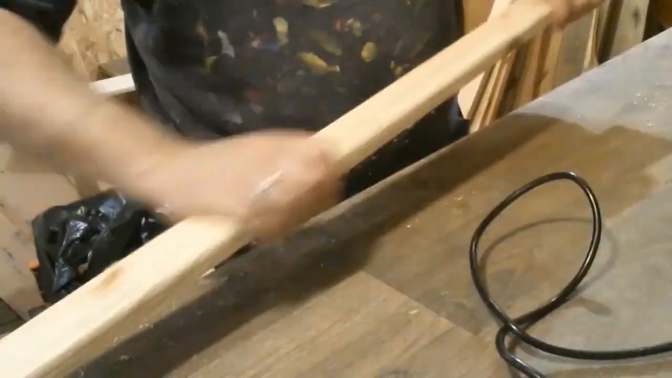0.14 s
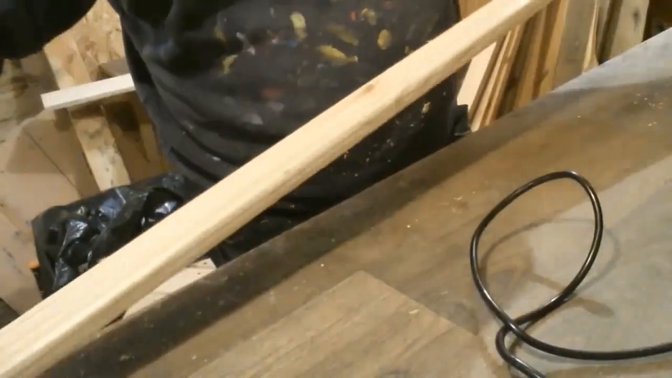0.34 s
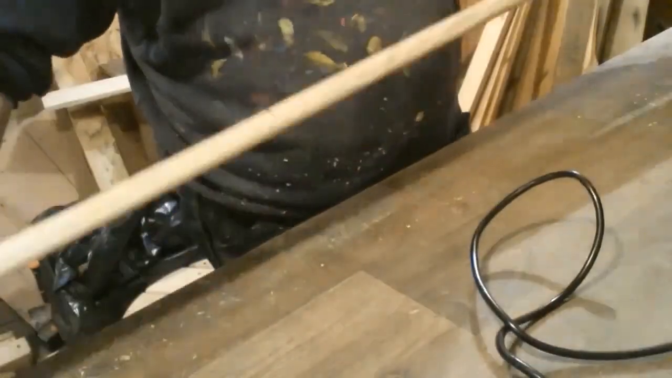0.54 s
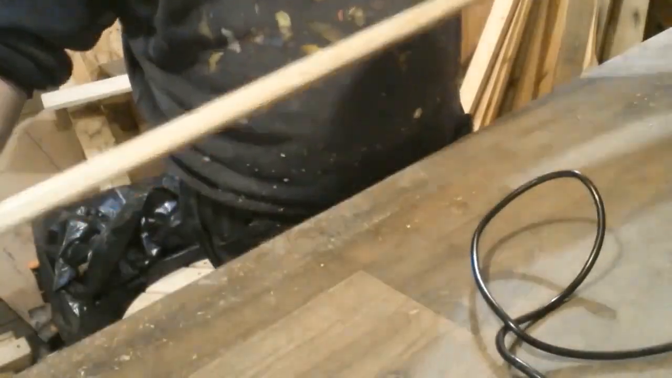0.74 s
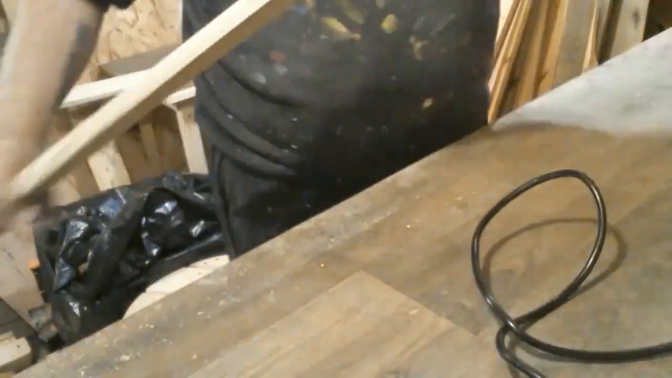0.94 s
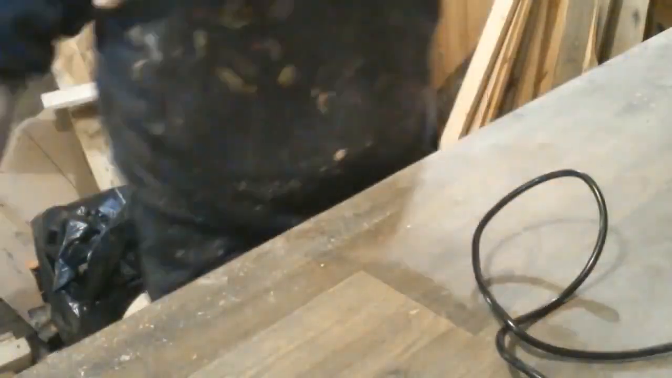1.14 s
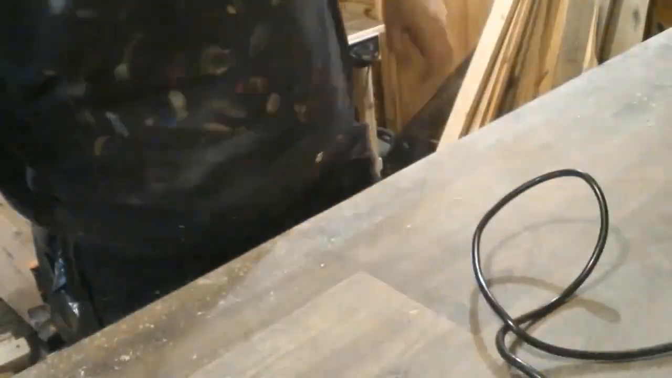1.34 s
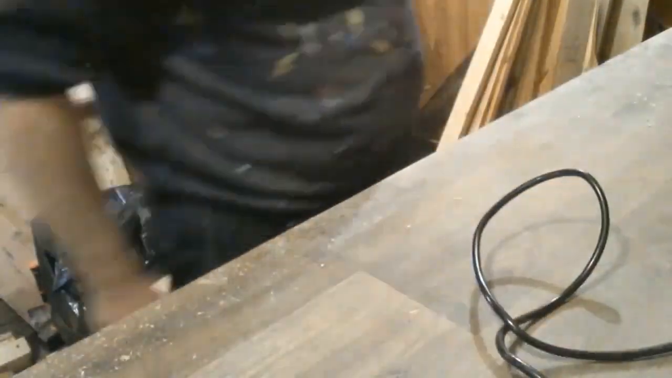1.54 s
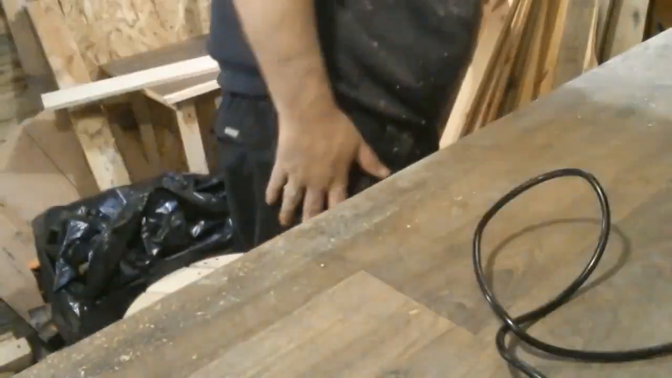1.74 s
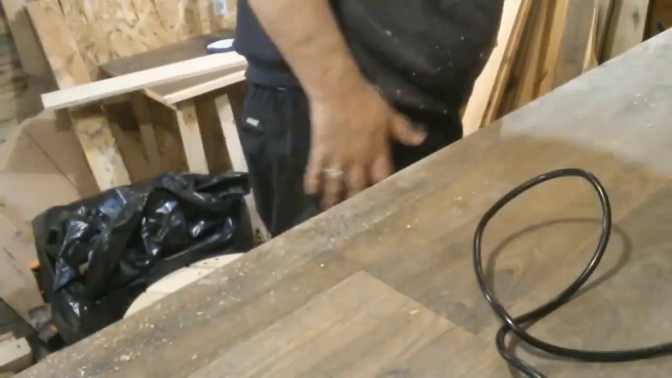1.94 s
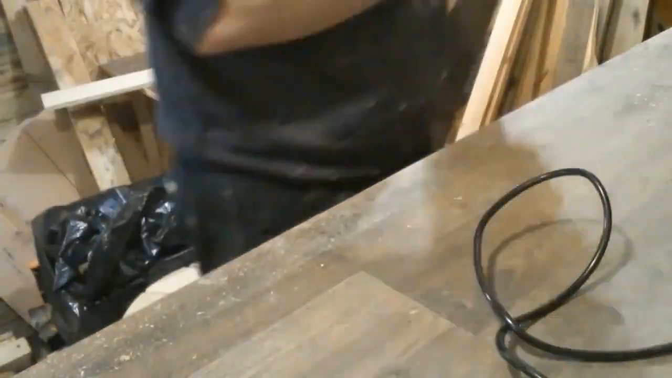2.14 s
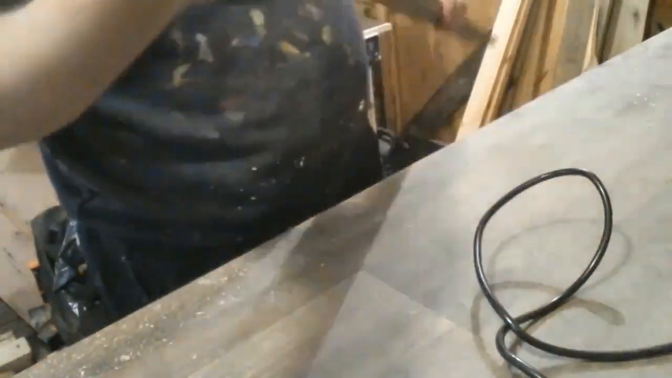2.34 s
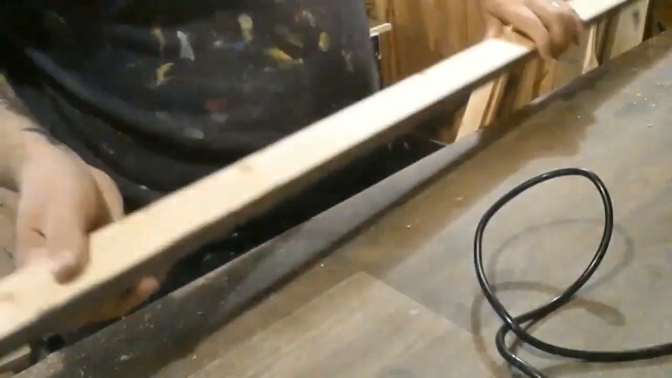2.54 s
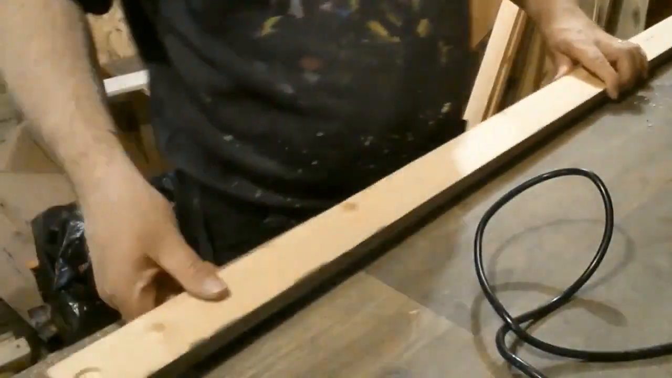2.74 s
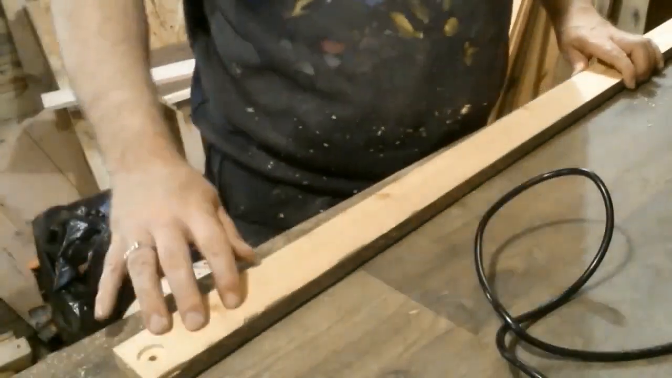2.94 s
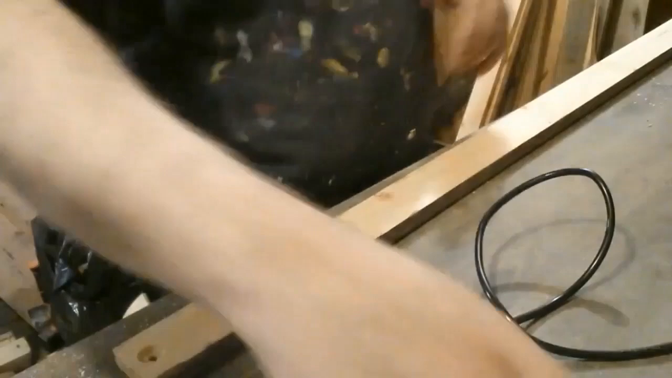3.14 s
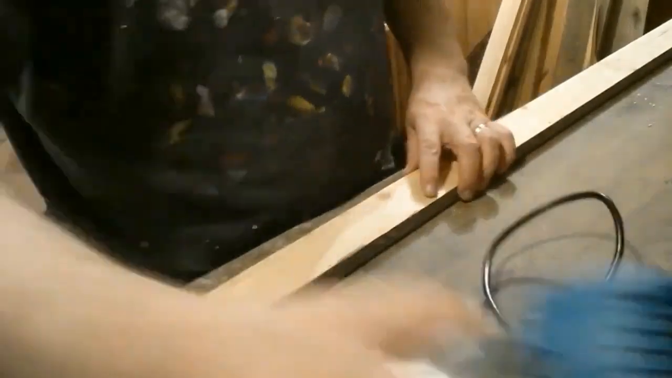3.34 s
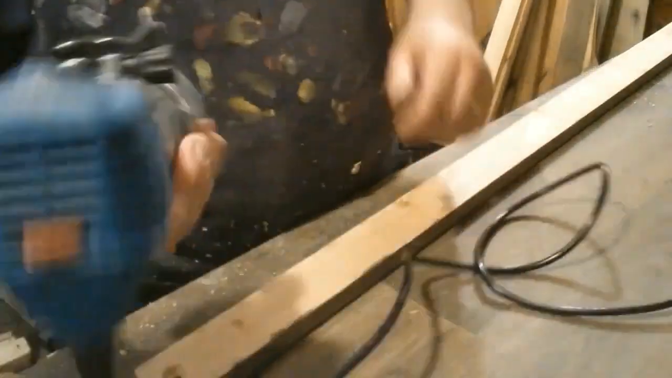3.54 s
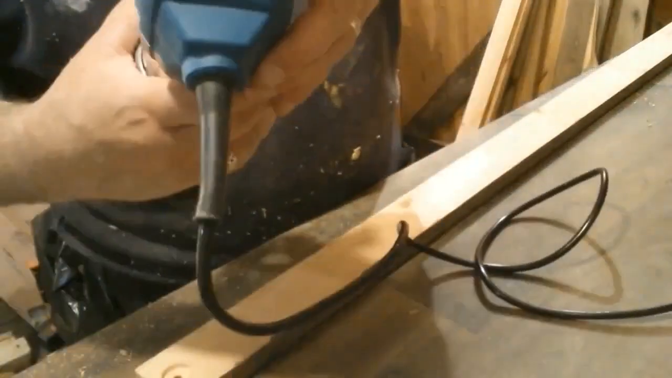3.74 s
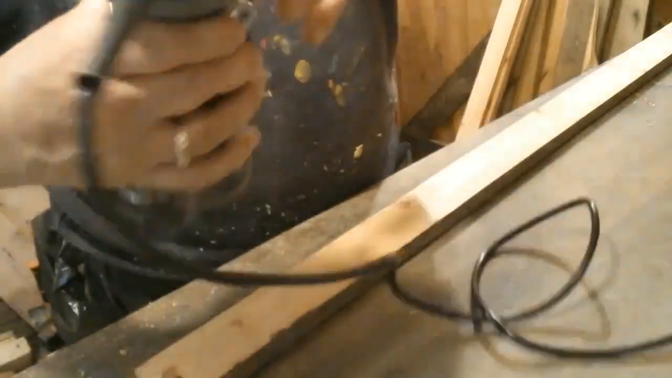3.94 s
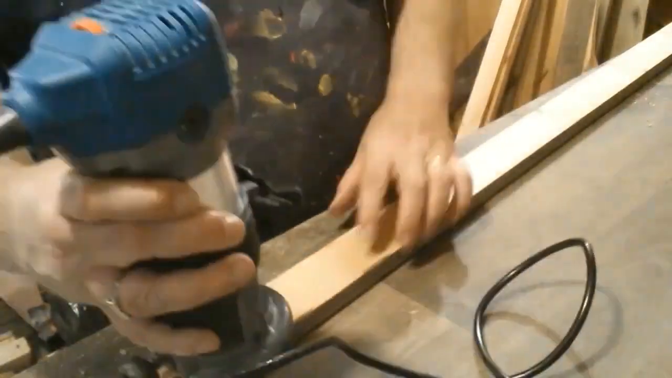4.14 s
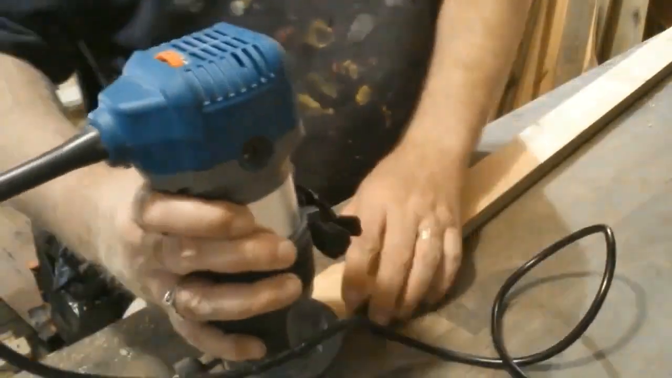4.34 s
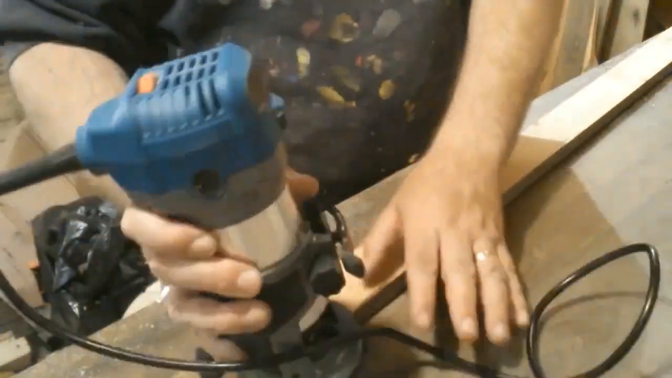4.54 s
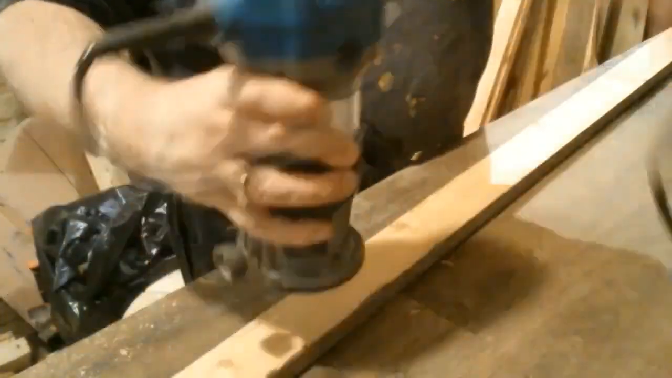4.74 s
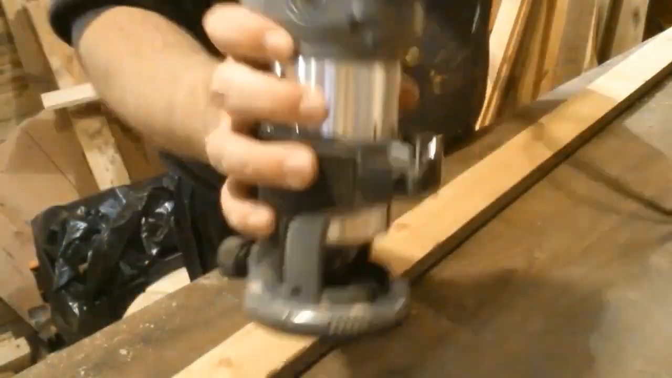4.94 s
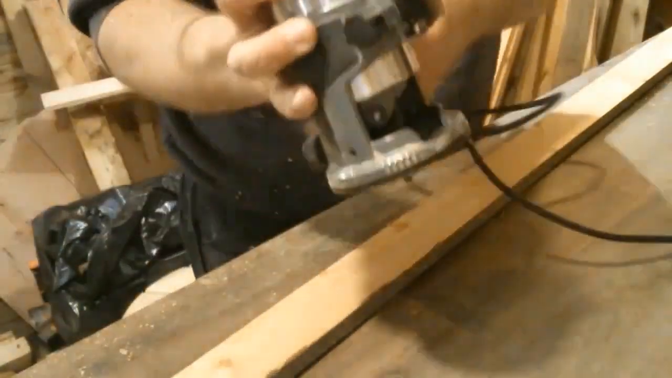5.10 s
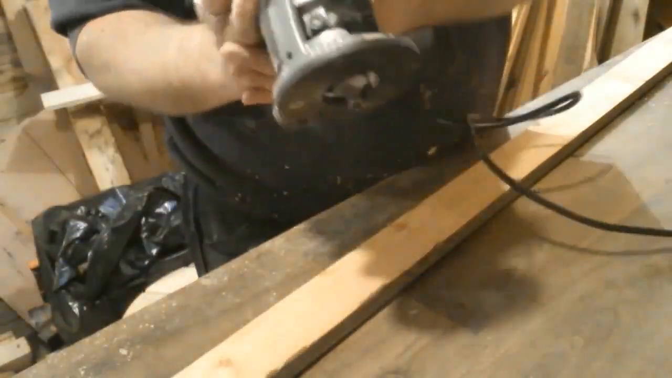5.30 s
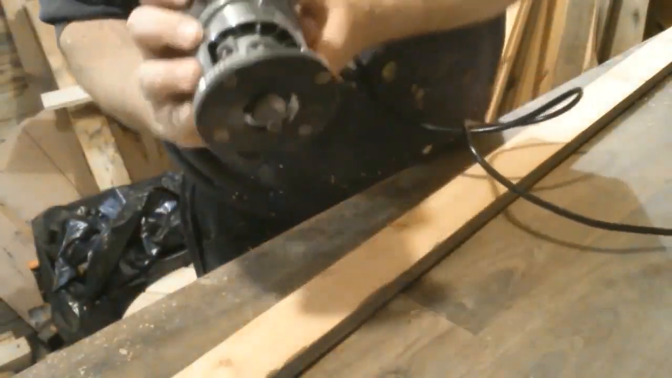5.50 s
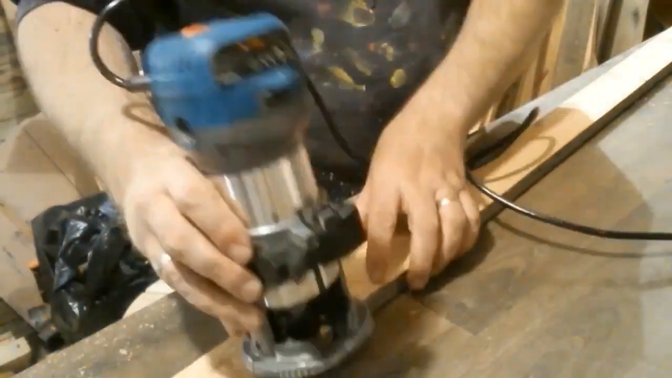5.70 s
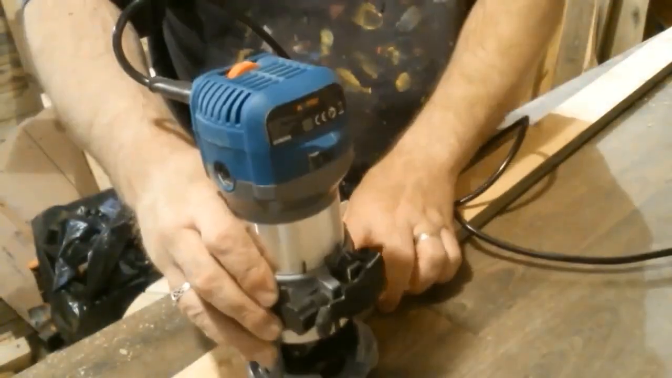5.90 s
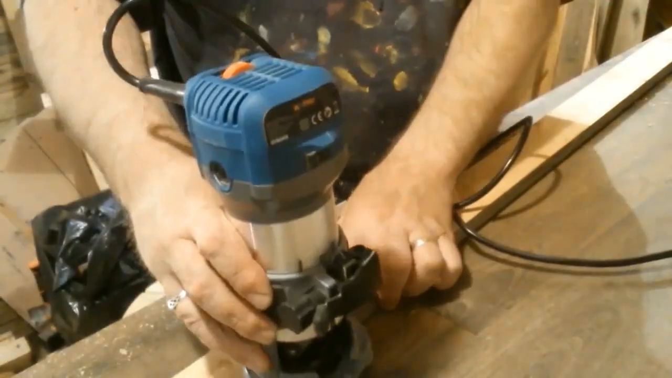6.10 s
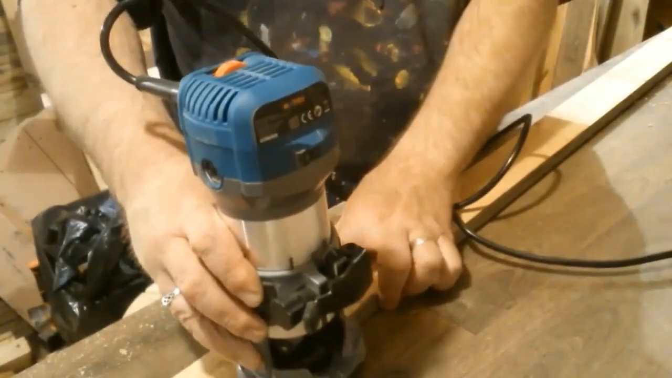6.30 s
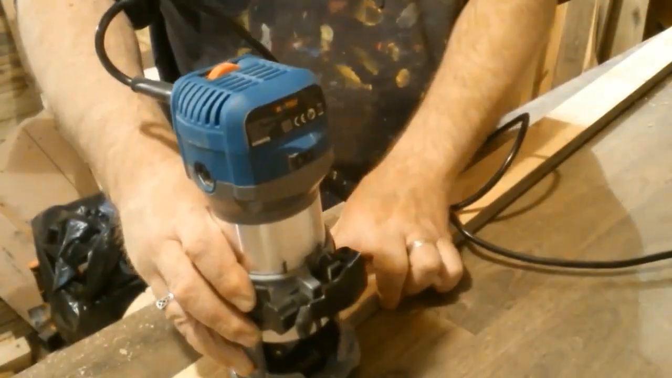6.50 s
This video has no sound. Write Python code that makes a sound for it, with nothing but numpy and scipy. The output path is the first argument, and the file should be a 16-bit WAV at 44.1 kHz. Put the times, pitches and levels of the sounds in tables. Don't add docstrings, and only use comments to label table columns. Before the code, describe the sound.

In a small workshop, the hiss of a finished cut dies away while hands and cloth rustle and planks knock on a bench, one heavy thump standing out, another sharper clack later. Over low room hum a handheld electric router then starts, rising fast to a high whine with strong rushing air, and dips slightly in pitch as it meets the wood. Close microphone, noise reduction making the rush patchy.

```python
import sys
import numpy as np
from scipy import signal
from scipy.fft import rfft, irfft
from scipy.io import wavfile
from scipy.ndimage import uniform_filter1d

SR = 44100
rng = np.random.default_rng(int(sys.argv[2]) if len(sys.argv) > 2 else 0)


def level_to_linear(level):
    exponent = np.asarray(level, float) / 20
    return 10 ** exponent


def dump_mix(stems):
    frames = np.atleast_2d(stems).T
    limited = np.clip(frames, -1, 1)
    pcm = np.round(limited * 32767).astype(np.int16)
    wavfile.write(sys.argv[1], SR, pcm)


N = 289296
HZ = np.fft.rfftfreq(512, 1 / SR)[:, None]
FRAME_S = np.arange(N // 128 + 5) * 128 / SR

# [t/s, f/Hz]
SPEED = [(3.88, 1000), (3.95, 1150), (4.02, 1299), (4.06, 1371), (4.11, 1430), (4.16, 1479), (4.24, 1527),
         (4.34, 1561), (4.46, 1591), (4.61, 1611), (4.8, 1619), (5.03, 1622), (5.33, 1612), (5.63, 1602),
         (6.22, 1592), (6.28, 1553), (6.46, 1535), (6.56, 1508)]
ORDERS_DB = {1: -67, 2: -59.5, 3: -67, 4: -60, 5: -68.5, 6: -68.5, 8: -56, 9: -63.5}
# [f/Hz, likeness 0..1]
SHOP_SAME = [(25, 0.37), (60, 1), (140, 0.97), (550, 0.91), (1650, .5), (5000, 0.071), (15000, 0.12)]


def evened(x):
    return x / np.sqrt(np.mean(x ** 2) + 1e-20)


def read(points, hz):
    f, value = np.transpose(points)
    return np.interp(np.log(hz + 1), np.log(f + 1), value)


def columns(rows, t):
    s, *values = np.transpose(rows)
    return [np.interp(t, s, v) for v in values]


def add(mix, s, sound):
    part = mix[:, round(s * SR):][:, :sound.shape[1]]
    part += sound[:, :part.shape[1]]


def held(t, start, length, rise, fall):
    return -rise * np.maximum(start - t, 0) - fall * np.maximum(t - start - length, 0)


def summed(*dbs):
    return 10 * np.log10(sum(level_to_linear(db) ** 2 for db in dbs) + 1e-30)


def patches(bins, frames):
    field = rng.standard_normal((len(FRAME_S), len(HZ))).T
    field = uniform_filter1d(field, bins, 0)
    return evened(uniform_filter1d(field, frames, 1))


def pair(level_db, same, lead=0.):
    a, b, c, d = rng.standard_normal((len(FRAME_S), len(HZ), 4)).T
    same = np.clip(same, 0, 1)
    left, other = a + 1j * b, c + 1j * d
    right = (same * left + np.sqrt(1 - same ** 2) * other) * np.exp(-1j * lead)
    spectra = np.array([left, right]) * level_to_linear(level_db)
    return 0.73 * signal.istft(spectra, nperseg=512, noverlap=384)[1][:, :N]


def band_db(colour, lo_hz, hi_hz):
    db = read(colour, HZ)
    in_band = (HZ > lo_hz) & (HZ < hi_hz)
    return db - 10 * np.log10(np.sum(level_to_linear(db[in_band]) ** 2))


def fade(lo_hz, hi_hz):
    return np.clip(np.log((HZ + 1) / lo_hz) / np.log(hi_hz / lo_hz), 0, 1)


def tinted(x, colour, lo_hz, hi_hz):
    hz = np.fft.rfftfreq(N, 1 / SR)
    gain = level_to_linear(read(colour, hz))
    share = np.sum(gain[(hz > lo_hz) & (hz < hi_hz)] ** 2) / len(hz)
    return irfft(rfft(x) * gain / np.sqrt(share), N)


def shop():
    # [f/Hz, level/dB per Hz]
    rustle_colour = [(530, -35.5), (900, -3), (1370, -13.5), (2020, -12), (3040, -15.5), (3590, -16.5),
                     (7060, -17.5), (15100, -16), (16000, -20.5)]
    # [t/s, length/s, level/dB, low part relative/dB]
    strokes = [(0.456, 0.02, -60, -9.5), (0.522, 0.098, -68, -7), (0.655, .03, -64.5, -7),
               (0.713, 0.017, -60.5, -2.5), (0.753, 0.034, -68, -5.5), (0.808, 0.017, -59.5, -3),
               (0.833, 0.27, -58, -13), (1.134, 0.029, -64.5, 7), (1.191, 0.1, -64, -9.5),
               (1.537, 0.22, -76, -1.5), (1.676, 0.045, -65.5, 1.5), (1.744, 0.24, -79, 0),
               (2.075, 0.16, -75, -3), (2.184, 0.031, -69.5, 5.5), (2.228, .12, -62, -10),
               (2.286, 0.031, -76, 16.5), (2.456, 0.18, -76.5, -9), (2.672, 0.023, -72, -10),
               (2.734, 0.06, -65, -3.5), (2.797, 0.095, -72.5, 8), (3.154, 0.01, -71, 6.5),
               (3.17, 0.15, -72.5, -2), (3.382, 0.072, -67, 1.5), (3.492, 0.088, -76.5, 1.5),
               (3.645, 0.015, -82, -4)]
    hiss_db = -79.5
    rise, fall = 1200, 801
    colour_db = band_db(rustle_colour, 2500, 16100) - 30 * (1 - fade(400, 1000))
    colour_db = colour_db - 70 * (FRAME_S > 3.845)
    low = 1 - fade(2300, 4600)

    dying_db = -38 - 38 * FRAME_S + held(FRAME_S, 0, 0.42, rise, fall)
    dying_db = dying_db + low * (-9.5 - 12 * (FRAME_S > 0.333))
    strokes_db = (top_db + low_db * low + held(FRAME_S, s, length, rise, fall)
                  for s, length, top_db, low_db in strokes)
    db = colour_db + summed(dying_db, *strokes_db)
    db = db + 3.15 * patches(3, 14) + 1.3 * patches(150, 2)
    return pair(summed(db, colour_db + hiss_db), read(SHOP_SAME, HZ))


def hum():
    # [f/Hz, level/dB per Hz]
    hum_colour = [(12, -51.5), (20, -18.5), (54, -24), (113, -11.5), (188, -10), (274, 0.5), (339, -6),
                  (511, -8), (564, -9.5), (622, -5), (709, -10), (835, -20), (1000, -31.5), (1300, -58.5),
                  (2200, -120)]
    # [t/s, length/s, level/dB]
    swells = [(0, 0.03, -56), (0.076, 0.01, -44.5), (0.082, 1.1, -59.5), (0.29, 0.031, -73.5),
              (0.432, 0.043, -75), (0.596, 0.045, -63), (1.22, 0.13, -62.5), (1.39, 0.1, -68.5),
              (1.526, .02, -61), (1.584, 0.33, -63.5), (1.762, 0.057, -59.5), (1.885, .025, -61),
              (1.953, 0.11, -66.5), (2.074, 0.18, -63), (2.29, 0.034, -57), (2.368, 0.042, -64.5),
              (2.432, 0.5, -69), (2.843, 0.11, -70.5), (3.053, 0.54, -67), (3.16, .15, -63),
              (3.397, .04, -63.5), (3.495, 0.021, -65), (3.56, 0.083, -70), (3.794, .07, -74),
              (3.914, .01, -66)]
    hum_db, drone_db, swing = -74, -89.5, 401
    swells_db = (top_db + held(FRAME_S, s, length, swing, swing) for s, length, top_db in swells)
    db = summed(hum_db, *swells_db) + 2.7 * patches(2, 8) - 10 * np.log10(len(HZ))
    swelling = tinted(pair(db, read(SHOP_SAME, HZ)), hum_colour, 120, 900)

    drone_colour = [(15, -1.5), (40, -1.0), (120, 2.5), (200, -23.5), (400, -77)]  # (Hz, dB)
    drone = tinted(rng.standard_normal((2, N)), drone_colour, 25.4, 200)
    mute = level_to_linear(-80 * np.clip((np.arange(N) / SR - 3.89) / 0.086, 0, 1))
    return mute * (swelling + level_to_linear(drone_db) * drone)


def knock(db, hz, bright_db, crack_db, chance):
    # [ratio to the body tone, level/dB, t60/s]
    modes = [(1.0, 1.5, 0.16), (1.5, -0.5, .09), (1.9, -11, 0.12), (2.45, -2.5, 0.073), (3.2, -17, 0.15),
             (3.9, -8.5, .05), (4.4, -16.5, 0.031), (5.3, -21.5, 0.031), (6.4, -21, 0.047),
             (7.7, -25.5, .03), (9.1, -19, 0.015)]
    t = np.arange(6000) / SR
    ring = 0.5
    body = 0
    for (ratio, mode_db, t60), c in zip(modes, chance[0]):
        decay = level_to_linear(mode_db + bright_db * np.log2(ratio) - 60 * t / (t60 * ring))
        body = body + decay * np.sin(2 * np.pi * hz * ratio * (1 + 0.066 * c) * t)
    body = body * np.clip(t / .0012, 0, 1)

    crack = signal.lfilter([1, -1], [1, -1.7, .72], chance)
    crack = crack * (level_to_linear(-60 * t / 0.042) + level_to_linear(-11 - 60 * t / 0.076))
    crack_pair = (crack + 0.71 * crack[0]) / abs(crack).max() / 2
    sound = body / abs(body).max() + level_to_linear(crack_db) * crack_pair

    echoes = chance[:, ::-1] * level_to_linear(-60 * t / .1) * (t > .004)
    echoes = (echoes + 1.2 * echoes[0]) / np.linalg.norm(echoes) / 2
    sound = sound + level_to_linear(-7.5) * signal.fftconvolve(sound, echoes, axes=1)[:, :len(t)]
    sound = signal.sosfilt(signal.butter(2, 190, "high", fs=SR, output="sos"), sound)
    return level_to_linear(db + np.array([[-.5], [.5]])) * sound


def air():
    # [t/s, level/dB, turn of the vents (+ towards the microphone)]
    rush = [(3.9, -38.5, 0.81), (4.05, -40, 0.41), (4.42, -41, 0.45), (4.75, -44, -0.29),
            (4.9, -42.5, 0.23), (5.0, -43, -0.1), (5.14, -43.5, -1.34), (5.25, -40, 0.58),
            (5.62, -42, 0.46), (5.7, -42.5, 0.73), (5.85, -41.5, -0.06), (6.12, -42.5, 0.0014),
            (6.2, -41.5, 0.54), (6.33, -42, 0.43), (6.56, -41, -0.52)]
    # [f/Hz, level/dB per Hz]
    air_colour = [(1120, -55.5), (1900, -6.5), (2500, -6.5), (2910, -2), (3510, 0.5), (4720, 0), (5840, -1),
                  (11100, -0.5), (12000, -0.5), (15200, 0.5), (16000, -18)]
    # [f/Hz, likeness 0..1]
    air_same = [(1500, 0.92), (2500, 0.81), (5000, 0.18), (9000, 0.2), (15000, 0.44)]
    # [t/s, delay/s]
    air_lead = [(3.85, 2e-5), (4.3, 7e-5), (4.8, -4e-5), (5.3, 5e-5), (5.8, -6e-5), (6.2, 6e-5),
                (6.56, -2e-5)]
    # [centre f/Hz, width/Hz, depth/dB]
    valleys = [(1800, 140, -15), (2230, 90, -5), (2900, 130, -6), (4350, 120, -3), (4800, 130, -5.5),
               (7600, 200, -3.5), (9300, 200, -2.5), (11700, 200, -2.5), (13250, 300, -4)]
    level_db, turn = columns(rush, FRAME_S)
    level_db = level_db + 6
    top_db = 1.5 * turn
    spun_s = np.maximum(FRAME_S - SPEED[0][0], 0)
    low_db = -2.5 * turn + 8 * np.exp(-spun_s / 0.31)

    lock_s, loose_hz = 4.06, 850
    locked = np.clip((FRAME_S - lock_s) / 0.074 + .5, 0, 1)
    edge_hz = loose_hz + (0.93 * columns(SPEED, FRAME_S)[0] - loose_hz) * locked
    under_db = -16 - 5.5 * np.clip((FRAME_S - lock_s) / 0.32, 0, 1)
    under_db = under_db + np.maximum(5 + held(FRAME_S, 1.9, .25, 25, 43), 0)

    db = band_db(air_colour, 3500, 9000)
    db = np.where(HZ < 2000, db[24], np.where(HZ > 15200, db[175], db))
    db = db + level_db + under_db * (1 - fade(1400, 1703))
    db = db + low_db * (1 - fade(2600, 3000)) + top_db * fade(8000, 10000)
    db = db - 700 * np.clip(1.053 + 0.019 * patches(8, 10) - HZ / edge_hz, 0, 1)
    drift = patches(3, 24)
    for hz, width, dip_db in valleys:
        db = db + dip_db * np.exp(-((HZ - hz) / width) ** 2) * np.clip(1 + 0.6 * drift, 0, 4)
    db = db + 2.2 * drift + 0.98 * patches(120, 3)
    start = np.clip((np.arange(N) / SR - 3.853) / 0.048, 0, 1)
    lead = 2 * np.pi * HZ * columns(air_lead, FRAME_S)[0]
    return start * pair(db, read(air_same, HZ), lead)


def beam(k, t):
    beams = {1: [(4.05, 0.065, -61.5, 0.77), (4.17, 0.12, -44.5, 0.44), (4.3, .48, -51, 0.24),
             (4.83, 0.18, -56.5, -0.059), (5.15, 0.16, -55, -0.56), (5.38, 0.22, -55.5, -0.66),
             (5.6, 0.26, -55, -0.93), (5.87, 0.17, -53, -0.38), (6.1, 0.16, -50, 0.073),
             (6.26, .35, -53.5, 1)], 2: [(3.96, .06, -53, 1), (4.32, .42, -55, 1), (5.25, .33, -51, 0.65),
             (5.72, 0.29, -54.5, -0.71), (6.35, .3, -49, 0.34)], 3: [(4.01, 0.053, -54, 0.76),
             (4.12, 0.11, -47, 0.69), (4.27, 0.1, -50, .2), (4.73, 0.091, -51.5, .8),
             (6.36, 0.047, -55.5, 0.81)], 4: [(4.21, 0.1, -48, 1.7), (4.4, 0.31, -41.5, 0.63),
             (4.8, 0.097, -42.5, 0.86), (5.72, 0.56, -48, 0.7), (6.3, 0.32, -50.5, 0.97)]}
    beams_8 = [(4.02, .03, -43, 1.2), (4.08, .03, -45, .5), (4.19, .34, -47.5, 1), (4.7, .11, -48.5, 1),
               (4.85, .07, -46, -.7), (4.99, .06, -44, -.8), (5.085, .055, -44, 1), (5.17, .07, -44, -.9),
               (5.285, .25, -43.5, 1), (5.58, .06, -48, -.8), (5.69, .1, -43.5, 1), (5.84, .39, -44, -.35),
               (6.29, .16, -50, 1), (6.51, .1, -56, -5)]
    swing = 301
    rows = [(0, t[-1], ORDERS_DB[k], 0.94)] + {**beams, 8: beams_8}.get(k, [])
    powers = [level_to_linear(db + held(t, s, length, swing, swing)) ** 2 for s, length, db, share in rows]
    left = np.sqrt(sum(powers))
    right = sum(power * row[3] for power, row in zip(powers, rows)) / left
    return left, right


def whine():
    first = round(3.85 * SR)
    t = np.arange(first, N) / SR
    turns = np.cumsum(columns(SPEED, t)[0]) / SR
    out = np.zeros((2, N))
    for k in ORDERS_DB:
        ports = beam(k, t)
        slow = [np.interp(t, FRAME_S, evened(uniform_filter1d(v, 12)))
                for v in rng.standard_normal((5, len(FRAME_S)))]
        speak = np.clip((t - (3.99 if k < 3 else 3.92)) / 0.091, 0, 1)
        for ear, side in enumerate((1, -1)):
            phase = 2 * np.pi * k * turns + .5 * slow[0] + 0.05 * side * slow[1] + 0.13 * side
            waver = level_to_linear(1.6 * slow[2 + ear] + 1.8 * slow[4] / k)
            out[ear, first:] += np.sqrt(2) * speak * ports[ear] * waver * np.cos(phase)
    return out


def leaks():
    # [t/s, level/dB, centre f/Hz, width/Hz, length/s]
    blobs = [(4.206, -75, 1257, 300, 0.16), (4.42, -81.5, 1178, 245, 0.29), (5.52, -65.5, 1036, 199, 0.035),
             (5.628, -64, 865, 298, 0.053), (5.634, -54, 390, 476, 0.076), (5.956, -87, 1225, 137.5, 0.38),
             (6.134, -61.5, 592, 179, 0.062), (6.18, -80.5, 1207, 251, 0.23), (6.442, -71, 600, 180, 0.075),
             (6.523, -68, 604, 200, 0.04), (6.508, -77, 1090, 250, 0.1)]
    power = 1e-14
    for s, db, hz, width, length in blobs:
        shape = np.exp(-((HZ - hz) / (0.32 * width)) ** 4)
        swell = np.exp(-((FRAME_S - s) / (0.37 * length)) ** 2 * 1.6)
        power = power + level_to_linear(db) ** 2 * shape / shape.sum() * swell
    return pair(10 * np.log10(power) + 4.8 * patches(1, 5), 0.96)


def scene():
    # [t/s, peak level/dB, body f/Hz, brightness/dB per octave, crack relative/dB]
    knocks = [(.071, -36, 474, -2, -25), (.284, -44.5, 457, 1.5, -23), (.61, -49, 278, -10, -11),
              (0.841, -51.5, 310, 1, -21), (1.138, -60.5, 277, -5, 21.5), (1.3285, -24, 249.6, 2.5, -22),
              (1.333, -23, 243, 2, -16), (1.519, -51.5, 458, -7, -14), (1.578, -67, 362, -7, -8),
              (1.671, -64.5, 480, -12, 13.5), (1.722, -55, 300, -1, -21), (1.914, -64, 228, 1, -2),
              (2.19, -56.5, 370, 11, 8), (2.278, -56, 342, 3, -23), (2.7947, -30, 251.3, 9.5, -2),
              (2.862, -45, 265, 2, -1), (3.145, -68, 322, 6, -9), (3.173, -55.5, 256, 9, -23),
              (3.27, -59.5, 216, 8, -22), (3.377, -64, 410, -3, -13), (3.4, -52.5, 193, 8, -7),
              (3.56, -72, 277, 4, -12)]
    mix = air() + whine() + leaks() + hum() + shop()
    for (s, *row), chance in zip(knocks, rng.standard_normal((len(knocks), 2, 6000))):
        add(mix, s - .0008, knock(*row, chance))
    return mix


def top_cut(x):
    return signal.sosfilt(signal.butter(12, 17000, fs=SR, output="sos"), x)


def record(dry):
    hz, t, z = signal.stft(dry, SR, nperseg=1024, noverlap=768)
    hz = hz[:, None]
    power = uniform_filter1d((abs(z) ** 2).mean(0), 9, 1)
    power = uniform_filter1d(power, 2, 0) + 1e-20
    power_db = 10 * np.log10(abs(power))
    under_db = uniform_filter1d(power_db, 25, 0) - power_db
    buried_db = 10 * np.log10(power[25:].mean(0)) - power_db
    weak = under_db + .2 * np.clip(buried_db, 0, 16) - 4.2
    holes = np.clip(weak, 0, 1) * (abs(hz - 8450) < 6900)
    muted = np.clip((buried_db - 38) / 3, 0, 1) * (t > 3.92)
    cut = uniform_filter1d(np.clip(holes + muted, 0, 1), 3, 1)
    gain = level_to_linear(-26 * cut) * (hz < 15870)
    mix = signal.istft(z * gain, SR, nperseg=1024, noverlap=768)[1][:, :N]
    return top_cut(mix)


dry = scene()
out = record(dry)
dump_mix(out)
```